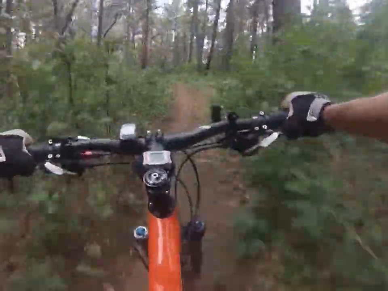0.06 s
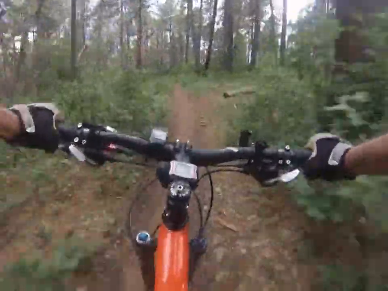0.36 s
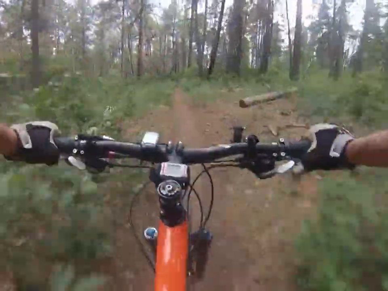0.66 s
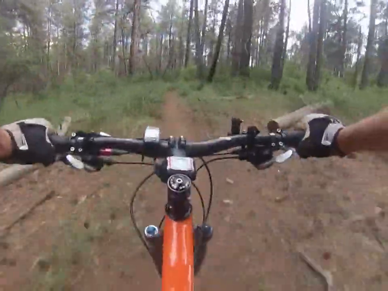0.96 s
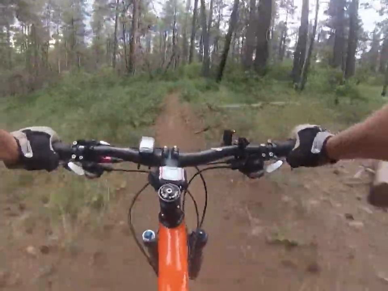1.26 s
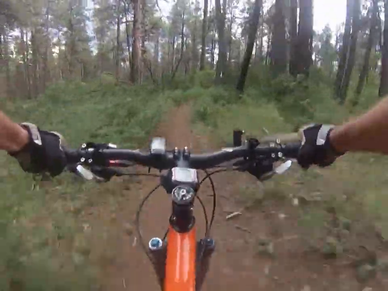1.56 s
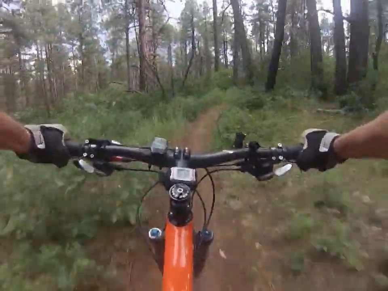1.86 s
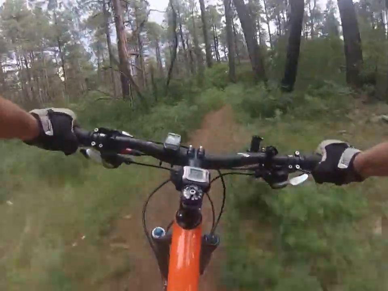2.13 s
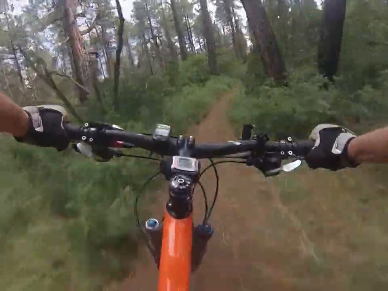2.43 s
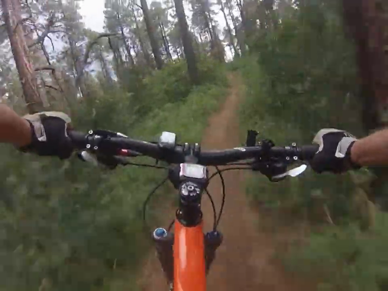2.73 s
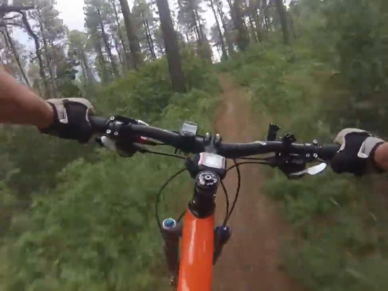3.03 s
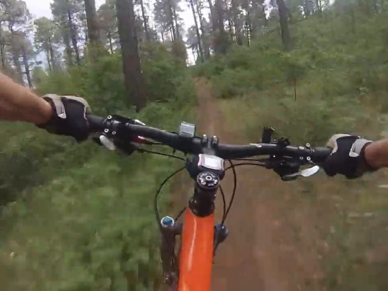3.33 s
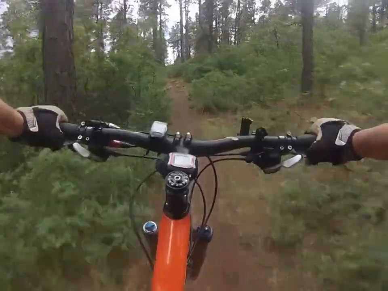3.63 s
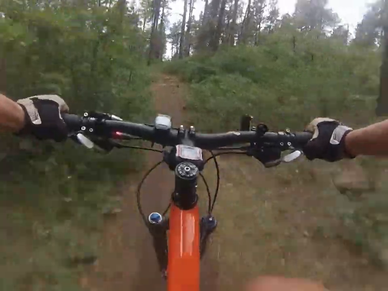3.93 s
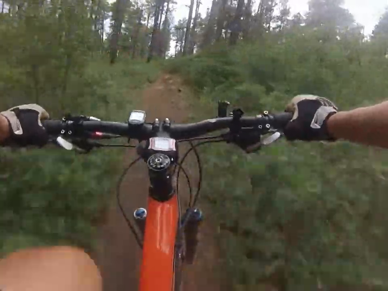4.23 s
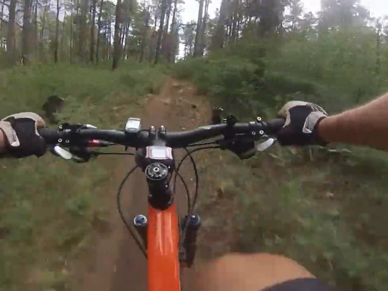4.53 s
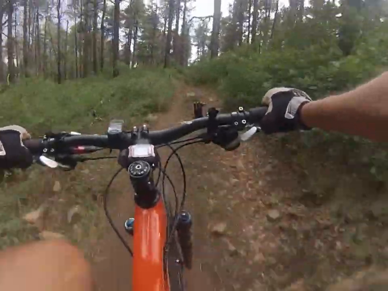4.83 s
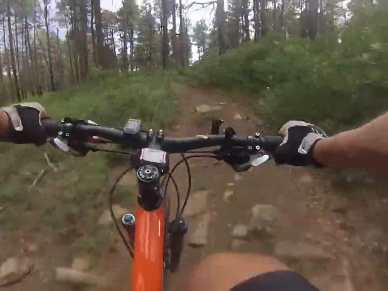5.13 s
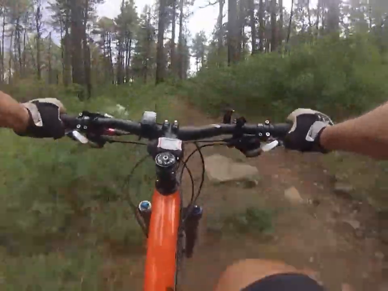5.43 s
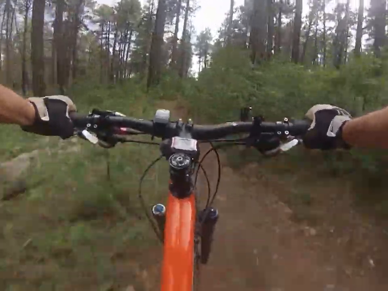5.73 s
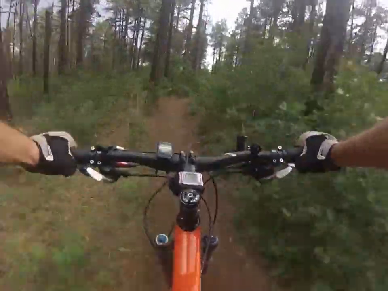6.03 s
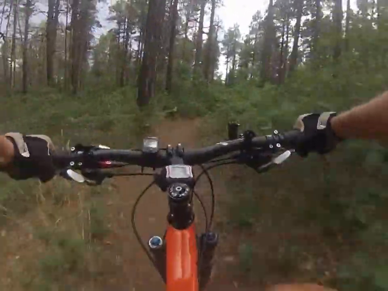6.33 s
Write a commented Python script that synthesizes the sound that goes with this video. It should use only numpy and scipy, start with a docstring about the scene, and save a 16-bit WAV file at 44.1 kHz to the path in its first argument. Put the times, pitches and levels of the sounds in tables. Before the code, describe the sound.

A mountain bike rolls down a forest dirt trail, heard close from the rider's chest. Wind rumbles and flutters on the microphone throughout, over the soft roar of tyres and heavy thuds through the suspension. The chain knocks on the frame and stones click. Early on, the gears ping faintly and the tyres scrub briefly. Stronger gusts and bumps follow, then gravel, stones and chain clatter together near the end.

```python
"""A dirt trail in a forest, heard from a camera on the chest of a mountain biker riding down it.
Air buffets the camera case, the tyres crunch over grit and scrub once in a turn, and leaves and loose
gravel swish past. Stones clack on the frame, stones and cables click, and the chain knocks, jangles
and pings over the gears. Under it all, bumps thud through the suspension."""
import sys
import numpy as np
from scipy import signal
from scipy.fft import rfft, irfft, next_fast_len
from scipy.io import wavfile
from scipy.ndimage import uniform_filter1d

SR = 44100
rng = np.random.default_rng(int(sys.argv[2]) if len(sys.argv) > 2 else 0)


def dump(signal):
    """Clip the signal to [-1, 1] and save it as 16-bit WAV at the path in sys.argv[1]."""
    limited = np.clip(np.atleast_2d(signal).T, -1, 1)
    pcm = np.round(limited * 32767).astype(np.int16)
    wavfile.write(sys.argv[1], SR, pcm)


N = 285758
TIME = np.arange(N) / SR

# pace of the ride, as the loudness of the rolling tyres: time_s, level_db
PACE = [(0, -59), (.2, -49.5), (2.25, -48.5), (3.45, -52.5), (3.87, -49), (4.28, -51.5), (5.05, -52),
        (5.55, -48), (6.12, -53), (6.48, -55.5)]
CRUISE_DB = -51  # tyre level at cruising pace
# gusts on the camera case: start_s, hold_s, flutter_db, rumble_db
GUSTS = [(-.02, .13, -50.5, -39.5), (0.31, 0.12, -35.5, -51), (0.8, 0.11, -41.5, -38),
         (1.182, 0.052, -33.5, -36), (2.535, .14, -39.5, -35.5), (3.083, 0.13, -33.5, -32),
         (3.31, 0.09, -37, -33.5), (3.791, 0.064, -40, -33.5), (4.439, 0.064, -41.5, -31.5),
         (4.655, 0.024, -40, -29), (4.975, 0.22, -35.5, -30), (5.205, 0.2, -38.5, -30),
         (5.573, 0.27, -43, -37), (5.919, 0.055, -38, -27)]
# lulls in the wind: middle_s, length_s
LULLS = [(.21, 0.095), (0.756, 0.023), (.99, 0.037), (3.7, 0.065), (4.25, 0.081)]
# tone of the deep rumble, the wind's flutter and a hard gust's harsh edge: freq_hz, gain_db
RUMBLE_EQ = [(12, -1), (55, -0.5), (95, -4), (160, -14), (2500, -110)]
FLUTTER_EQ = [(50, -17), (120, 1), (220, -2), (350, -8), (520, -12.5), (900, -32), (9000, -100)]
HARSH_EQ = [(300, 7), (850, 1.5), (9000, -81)]

# leaves and gravel sweeping past: middle_s, level_db, length_s, gravel_share (0 leaves, 1 gravel)
SWISHES = [(0.517, -62.5, 0.13, 0.78), (0.712, -61, 0.27, 0.89), (1.524, -59.5, 0.21, 1),
           (1.595, -59.5, 0.032, 0.89), (1.878, -59, 0.076, 0.96), (2.424, -65, 0.056, 0.097),
           (3.01, -69.5, 0.34, .05), (3.456, -64, 0.3, 0.02), (4.482, -58.5, 0.098, 0.65),
           (5.228, -65, 0.051, 0.055), (5.28, -59.5, 0.11, 0.6), (5.475, -57.5, 0.34, 0.82),
           (5.615, -63, 0.041, 0.14), (5.956, -57.5, 0.11, 0.22)]
# tone of the leaves and of the gravel: freq_hz, gain_db
LEAF_EQ = [(1000, -15), (3000, 2), (5200, 10), (7000, 3), (10000, 2.5), (15000, -7)]
GRAVEL_EQ = [(600, -23), (1700, 19), (2800, 7), (4000, 2), (14000, -27)]
# tone of the tyres rolling, crunching sand and scrubbing sideways: freq_hz, gain_db
ROAR_EQ = [(100, -19), (300, 5.5), (550, -2), (950, 3.5), (1400, -8.5), (1900, -9.5), (2400, -20.5),
           (3500, -25), (6000, -45.5)]
GRIT_EQ = [(800, -23), (2700, 1), (5400, 6), (6700, -2), (9000, -6), (12500, -11), (15000, -15)]
SCRUB_EQ = [(300, 6), (1000, 15), (1400, 4), (2900, -13.5), (15000, -39)]
# the skid in the turn: start_s, level_db, hold_s
SKID = (1.566, -39.5, 0.052)

# larger stones striking the frame: start_s, level_db
STONE_HITS = [(0.27, -42), (0.65, -37), (1.13, -43), (1.382, -42), (1.409, -42), (1.445, -45), (3.354, -42),
              (5.49, -37.5), (5.571, -41), (5.757, -42), (5.79, -44), (5.804, -44), (5.882, -43),
              (5.899, -35.5)]
# clicks of stones and cables: start_s, relative_level_db, relative_brightness_db
CLICKS = [(0.092, -56.5, -13), (0.6096, -51.5, -32), (0.651, -45, -6), (0.936, -56.5, -20), (2.301, -45, 2),
          (3.6622, -52.5, 8), (4.5087, -48.5, 0), (5.0767, -55.5, -7), (5.229, -49.5, -16),
          (5.6687, -50.5, -16), (5.987, -50, 5)]
# tone of a pebble's clack and of a sharp click: freq_hz, gain_db
PEBBLE_EQ = [(400, -5.5), (1100, 14), (1900, 3), (2800, -4.5), (14000, -33)]
CLICK_EQ = [(400, -68), (2000, 1.5), (5500, 11.5), (15500, -8)]

# the chain crossing the sprockets in a gear shift: start_s, level_db
SHIFT_PINGS = [(1.246, -53), (1.326, -57), (1.344, -57), (1.38, -63), (1.458, -53)]
# the chain thrown about: start_s, level_db, decay_s
JANGLES = [(0.476, -51.5, 0.015), (0.65, -49.5, 0.012), (0.868, -57, 0.02), (5.255, -60.5, 0.14),
           (5.452, -57, 0.06)]
# the chain striking the frame: start_s, relative_level_db, pitch_hz
CHAIN_KNOCKS = [(.397, -36, 635), (0.475, -34.5, 910), (.604, -33, 720), (0.6487, -32, 953),
                (.936, -36, 905), (2.118, -36, 700), (2.636, -35.5, 690), (2.776, -35, 750),
                (2.966, -38.5, 700), (4.055, -46, 654), (4.394, -39, 770), (4.594, -31, 690),
                (5.256, -33.5, 608), (5.332, -35, 520), (5.605, -34.5, 693), (5.769, -29.5, 708),
                (5.946, -35, 660), (6.037, -38.5, 690), (6.074, -39, 914), (6.205, -40.5, 690),
                (6.405, -37.5, 620)]
# the frame's ring under a knock: pitch_ratio, gain_db, t60_s (for a 700 Hz knock)
FRAME_MODES = [(.87, 0, 0.076), (0.998, 8.5, 0.031), (1.27, -2, 0.056)]
# bumps through the suspension: start_s, level_db, pitch_hz
BUMPS = [(0.317, -23, 51.3), (0.64, -20.5, 64.4), (0.803, -23, 131), (0.904, -20.5, 61),
         (1.218, -22.5, 115), (1.443, -20, 58.6), (1.55, -16.5, 33.8), (2.099, -17.5, 56),
         (2.847, -19, 130), (3.12, -11.5, 51), (3.62, -14.5, 71.5), (3.925, -24, 184), (4.053, -17, 130),
         (4.515, -20.5, 167), (4.928, -15.5, 106), (5.946, -18, 55)]
# resonances of the camera case: centre_hz, width_hz, lift_db
CASE_RESONANCES = [(1840, 380, 3), (2884, 500, 5.5), (3496, 420, 4.5), (4636, 810, 6), (5380, 950, 5),
                   (8450, 1900, 6), (12200, 3000, 5.5)]


def amp(db):
    """Decibels to gain."""
    return 10 ** (np.asarray(db) / 20)


def unit_rms(x):
    """Scales to rms 1."""
    return x / np.sqrt(np.mean(x ** 2) + 1e-20)


def add(mix, start_s, sound):
    """Drops a sound into the mix at start_s."""
    part = mix[max(round(start_s * SR), 0):][:len(sound)]
    part += sound[:len(part)]


def curve_db(points, hz):
    """Reads an EQ curve, straight between its points on a log-frequency axis."""
    freqs, db = np.transpose(points)
    return np.interp(np.log(hz + 1), np.log(freqs), db)


def colour(x, gain_db, size=8192):
    """Minimum-phase filter following gain_db(hz), so that attacks stay sharp."""
    log_gain = np.log(amp(gain_db(abs(np.fft.fftfreq(size, 1 / SR)))))
    taps = np.fft.ifft(np.exp(np.conj(signal.hilbert(log_gain)))).real
    return signal.fftconvolve(x, taps[:size // 2])[:len(x)]


def shaped(x, points):
    """Runs x through an EQ curve and sets it to rms 1."""
    return unit_rms(colour(x, lambda hz: curve_db(points, hz)))


def steadied(x, window_s):
    """Rides the gain to even out swells slower than the window."""
    return x / np.sqrt(abs(uniform_filter1d(x ** 2, int(window_s * SR) + 1)) + 1e-9)


def wander(hz):
    """Smooth random modulation of rms 1, up to about hz."""
    size = next_fast_len(N, real=True)
    lowpass = np.exp(-np.minimum(np.fft.rfftfreq(size, 1 / SR) / hz, 10) ** 2)
    return unit_rms(irfft(rfft(rng.standard_normal(size)) * lowpass, size)[:N])


def swell(middle_s, length_s):
    """Envelope of something brushing past: it peaks and falls away on both sides."""
    return 1 / (1 + (2 * (TIME - middle_s) / length_s) ** 2) ** 2


def surge(start_s, hold_s, rise_s=0.018, fall_s=0.043):
    """Envelope of a gust or scrape: it rises, holds and dies away."""
    age = TIME - start_s
    return np.clip(age / rise_s, 0, 1) * np.exp(-np.maximum(age - hold_s, 0) / fall_s)


def grains(per_s, spread_db):
    """Tiny impacts at random moments, mostly small and a few large."""
    size = amp(spread_db * np.minimum(rng.exponential(1, N), 4))
    return unit_rms(size * rng.choice([-1, 1], N) * (rng.random(N) < per_s / SR))


def scatter(sounds, per_s, spread_db):
    """Fires a set of one-shots at random moments and strengths."""
    return sum(signal.oaconvolve(grains(per_s / len(sounds), spread_db), hit)[:N] for hit in sounds)


def crackle(per_s):
    """Small hard bits snap against each other, each ringing a few cycles at its own pitch."""
    out, t = np.zeros(N), TIME[:SR // 100]
    pitches_hz = np.geomspace(1500, 14000, 14)
    for hz in pitches_hz:
        tick = hz * np.sin(2 * np.pi * hz * t) * amp(-60 * t * hz / 12)
        snaps = grains(per_s / len(pitches_hz), spread_db=3) * amp(2.5 * wander(40))
        out += signal.oaconvolve(snaps, tick)[:N]
    return unit_rms(out)


def struck(pitches_hz, t60_s, detune):
    """One blow on a set of modes, each randomly a little off its pitch."""
    t = TIME[:SR // 10]
    modes = sum(np.sin(2 * np.pi * hz * (1 + detune * rng.uniform(-1.16, 1)) * t) for hz in pitches_hz)
    return modes * amp(-60 * t / t60_s)


def shaking():
    """Large eddies and uneven ground rock the camera: a deep rumble."""
    return steadied(shaped(rng.standard_normal(N), RUMBLE_EQ), 0.114) * amp(2.0 * wander(9.5))


def buffeting(eq):
    """Eddies break on the camera case: a lumpy flutter."""
    eddies = rng.standard_normal(N) * amp(3.2 * wander(53))
    return steadied(shaped(eddies, eq), 0.061) * amp(1.7 * wander(6.9) - 1.5)


def wind(pace_db, flutter_db=-45, rumble_db=-39.5, harsh_db=-68.5, lull_db=-10):
    """Headwind and shaking grow with pace; gusts add to both, and the hardest turn harsh."""
    flutter = amp(flutter_db + 0.69 * pace_db)
    rumble = amp(rumble_db + 0.96 * pace_db)
    for start_s, hold_s, gust_flutter_db, gust_rumble_db in GUSTS:
        gust = surge(start_s, hold_s)
        flutter = np.hypot(flutter, amp(gust_flutter_db) * gust)
        rumble = np.hypot(rumble, amp(gust_rumble_db) * gust)
    harsh = amp(harsh_db) * (flutter / amp(flutter_db)) ** 2
    calm = amp(lull_db * sum(swell(middle_s, length_s) for middle_s, length_s in LULLS))
    return calm * (flutter * buffeting(FLUTTER_EQ) + harsh * buffeting(HARSH_EQ) + rumble * shaking())


def swishes():
    """Ragged swells of scratching sweep past: leaves fizz, gravel rasps lower."""
    fizz = (crackle(per_s=6000) + rng.standard_normal(N)) * amp(2 * wander(70))
    rasp = (crackle(per_s=3000) + grains(per_s=3000, spread_db=3)) * amp(3 * wander(70))
    leaves = steadied(shaped(fizz, LEAF_EQ), .08)
    gravel = steadied(shaped(rasp, GRAVEL_EQ), .08)
    out = np.zeros(N)
    for middle_s, db, length_s, gravel_share in SWISHES:
        blend = np.sqrt(1 - gravel_share) * leaves + np.sqrt(gravel_share) * gravel
        out += amp(db) * swell(middle_s, length_s) * blend
    return out


def grit(level_db):
    """Sand crackles under the tread in clumps, over a hiss and the faint tick of the freehub."""
    sand = crackle(per_s=2000) * amp(4.65 * wander(36))
    pawl_hz = 56 * (1 + .02 * wander(3))
    pawls = np.diff(np.floor(np.cumsum(pawl_hz) / SR), prepend=0)
    hiss = rng.standard_normal(N)
    freehub = unit_rms(pawls * amp(2 * wander(20)))
    return shaped(sand + hiss + .4 * freehub, GRIT_EQ) * amp(level_db)


def tyres(level_db):
    """Knobs slap the packed dirt: dense small blows in a soft roar."""
    tread = (grains(per_s=700, spread_db=3.0) + rng.standard_normal(N)) * amp(1.73 * wander(27))
    return shaped(tread, ROAR_EQ) * amp(level_db)


def skid():
    """Knobs bite, then slip and catch on the dirt: a short gritty scrape."""
    start_s, db, hold_s = SKID
    slips = (grains(per_s=820, spread_db=2.5) + .5 * rng.standard_normal(N)) * amp(2.6 * wander(69))
    return steadied(shaped(slips, SCRUB_EQ), 0.066) * amp(db) * surge(start_s, hold_s)


def pebbles(stray_db=-68.5, spray_db=-0.5):
    """The tyres flick pebbles at the frame: faint anywhere, a clatter around each patch of gravel."""
    t = TIME[:SR // 30]
    clacks = [unit_rms(rng.standard_normal(len(t))) * amp(-60 * t / 0.034) for _ in range(8)]
    clatter = scatter(clacks, per_s=55, spread_db=2.5)
    patches = sum(amp(db) * gravel_share * swell(middle_s, 1.6 * length_s)
                  for middle_s, db, length_s, gravel_share in SWISHES)
    return shaped(clatter, PEBBLE_EQ) * (amp(stray_db) + amp(spray_db) * patches)


def stones(tube_hz=(1090, 1670, 1970), t60_s=0.03):
    """A larger stone hits the frame: a dry contact and the hollow ring of the tube."""
    out = np.zeros(N)
    for start_s, db in STONE_HITS:
        ring = struck(tube_hz, t60_s, detune=.07)
        clack = shaped(rng.standard_normal(len(ring)), PEBBLE_EQ) * amp(-60 * TIME[:len(ring)] / t60_s)
        add(out, start_s, amp(db) * (.5 * clack + 0.66 * ring))
    return out


def clicks():
    """A hard contact with a brief splinter after it; heavy stones sound low, cables high."""
    out, t = np.zeros(N), TIME[:SR // 10]
    crack, splinter = amp(-60 * t / .011), amp(-60 * t / .05)
    for start_s, db, brightness in CLICKS:
        tilt = [(2400, -.35 * brightness), (5500, 0), (11000, 0.58 * brightness)]
        snap = rng.standard_normal(len(t)) * (crack + splinter / 4)
        snap = colour(snap, lambda hz: curve_db(tilt, hz))
        add(out, start_s, amp(db - 15.5) * shaped(snap, CLICK_EQ))
    return out


def gear_pings(sprocket_hz=(5000, 5250, 8270), t60_s=0.028):
    """A link drops onto a sprocket: a tiny scrape and a short steel ring."""
    out = np.zeros(N)
    for start_s, db in SHIFT_PINGS:
        ring = struck(sprocket_hz, t60_s, detune=.02)
        fade = amp(-60 * TIME[:len(ring)] / (.5 * t60_s))
        scrape = shaped(rng.standard_normal(len(ring)), CLICK_EQ) * fade
        add(out, start_s, amp(db) * (.5 * ring + 0.89 * scrape))
    return out


def chain_jangles(link_hz=(2510, 2830, 5300)):
    """Links collide in quick succession, ring at slightly different pitches, and settle."""
    links = [struck(link_hz, t60_s=0.014, detune=.06) for _ in range(8)]
    collisions = scatter(links, per_s=240, spread_db=4)
    thrown = sum(amp(db) * (TIME >= start_s) * np.exp(-abs(TIME - start_s) / decay_s)
                 for start_s, db, decay_s in JANGLES)
    return steadied(collisions, .03) * thrown


def chain_knocks(rise_s=0.00037, rebound_s=.027):
    """The chain strikes the frame: hollow modes, shorter when higher, and a rattle that rebounds once."""
    out, t = np.zeros(N), TIME[:SR // 8]
    for start_s, db, hz in CHAIN_KNOCKS:
        age = t * hz / 700
        ring = sum(amp(mode_db - 60 * age / t60_s) * np.sin(2 * np.pi * (hz * ratio * t + rng.random()))
                   for ratio, mode_db, t60_s in FRAME_MODES)
        blow = rng.standard_normal(len(t)) * amp(-60 * t / 0.013)
        rattle = 0.26 * shaped(blow, [(200, 8.0), (1900, -9.0), (3000, -26.0), (15000, -51)])
        add(out, start_s, amp(db - 7.0) * (ring * (1 - np.exp(-t / rise_s)) + rattle))
        add(out, start_s + rebound_s * rng.uniform(0.64, 1.7), amp(db - 13.5) * rattle)
    return out


def bumps(ring_cycles=5, rise_s=0.0014):
    """Each bump shoves the camera: a few heavy swings and a dull shudder, stronger in a quick blow."""
    out, t = np.zeros(N), TIME[:SR // 5]
    for start_s, db, hz in BUMPS:
        swing = np.sin(2 * np.pi * hz * t) * amp(-60 * t * hz / ring_cycles)
        shudder = shaped(rng.standard_normal(len(t)), FLUTTER_EQ) * amp(-60 * t / 0.1)
        add(out, start_s, amp(db) * (swing + hz / 380 * shudder) * (1 - np.exp(-t / rise_s)))
    return out


def scene():
    """Air, ground and bike, all close up and in mono."""
    tyre_db = np.interp(TIME, *np.transpose(PACE))
    bed = wind(pace_db=tyre_db - CRUISE_DB) + tyres(tyre_db) + grit(level_db=-70)
    bike = bumps() + chain_knocks() + clicks() + gear_pings() + chain_jangles()
    trail = skid() + pebbles() + stones() + swishes()
    return (bed + trail + bike)[None]


def record(dry):
    """The camera case adds its boxy resonances, and a steep low-pass trims the very top."""
    def case_db(hz):
        return sum(lift_db * np.exp(-(2 * (hz - centre_hz) / width_hz) ** 2)
                   for centre_hz, width_hz, lift_db in CASE_RESONANCES)

    lowpass = signal.firwin(511, cutoff=15400, window=("kaiser", 9), fs=SR)
    return signal.oaconvolve(colour(dry[0], case_db), lowpass, "same")[None]


dry = scene()
out = record(dry)
dump(out)
```